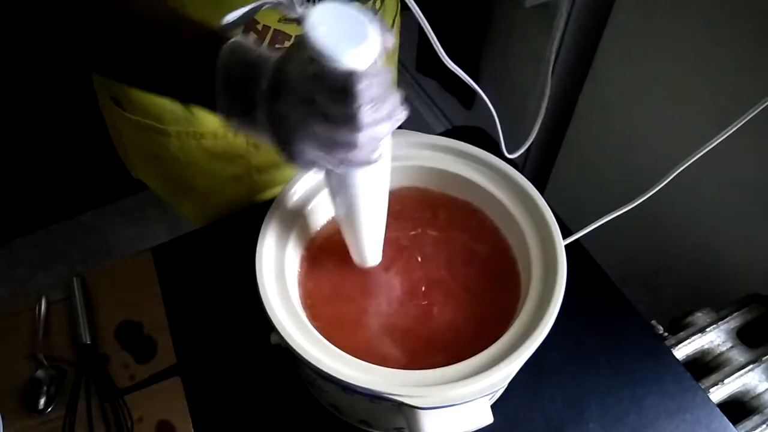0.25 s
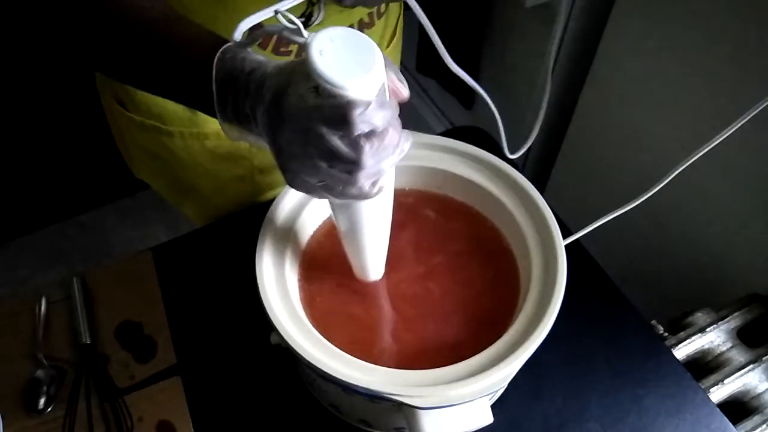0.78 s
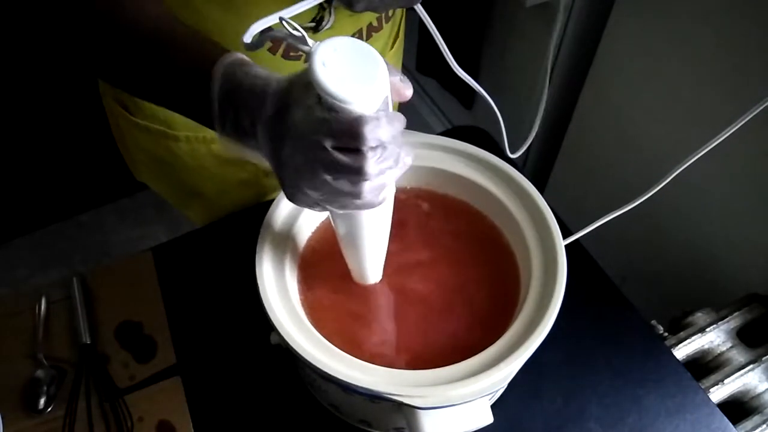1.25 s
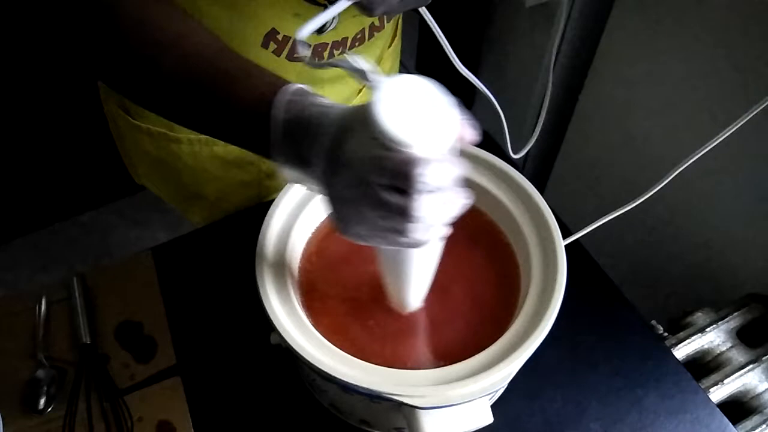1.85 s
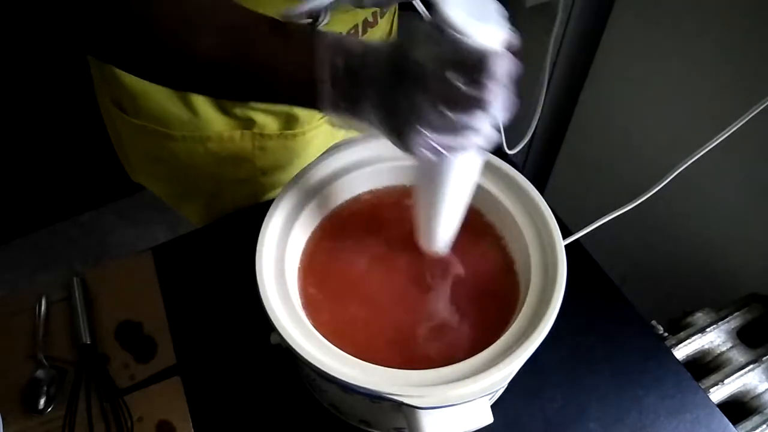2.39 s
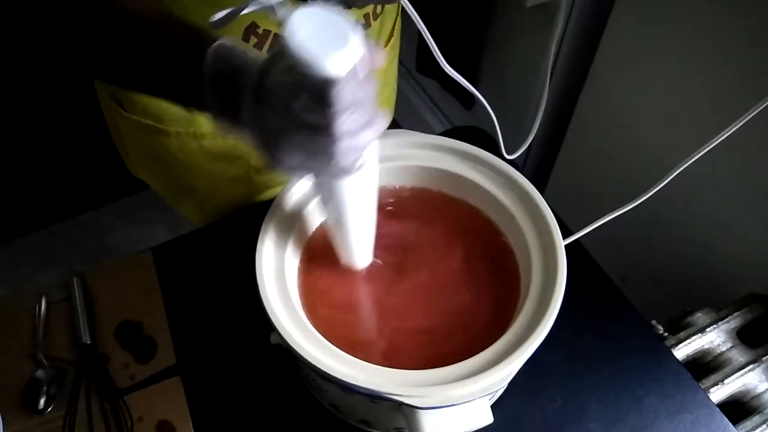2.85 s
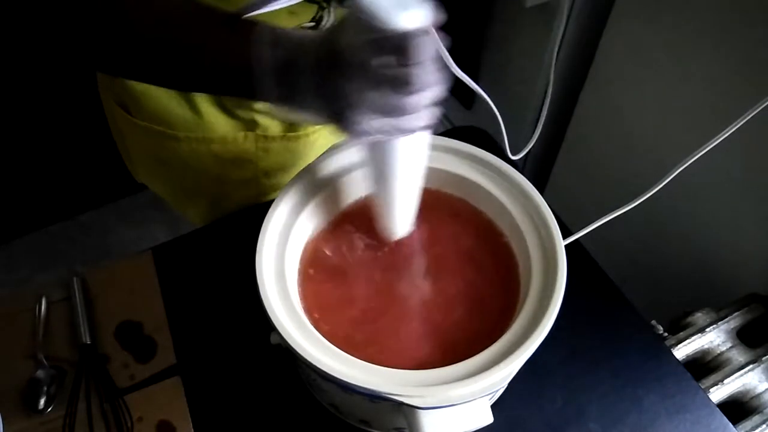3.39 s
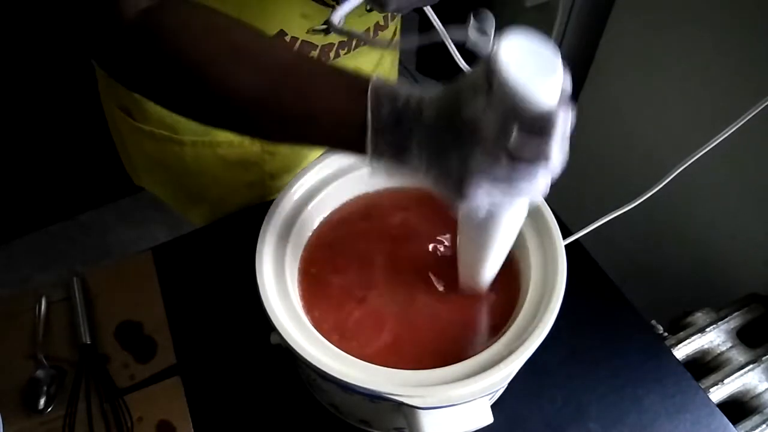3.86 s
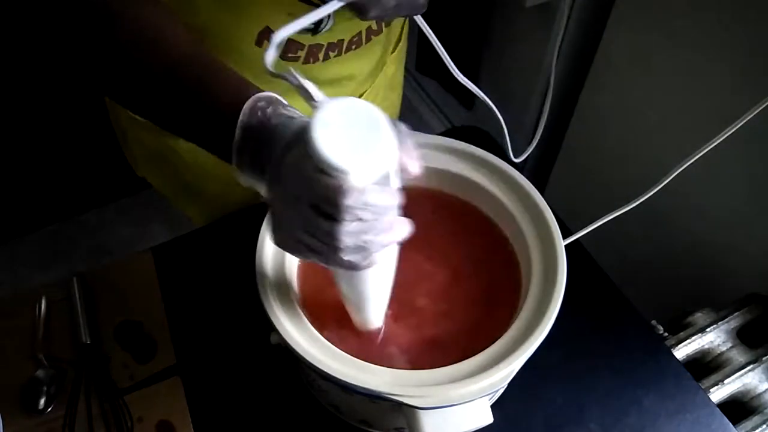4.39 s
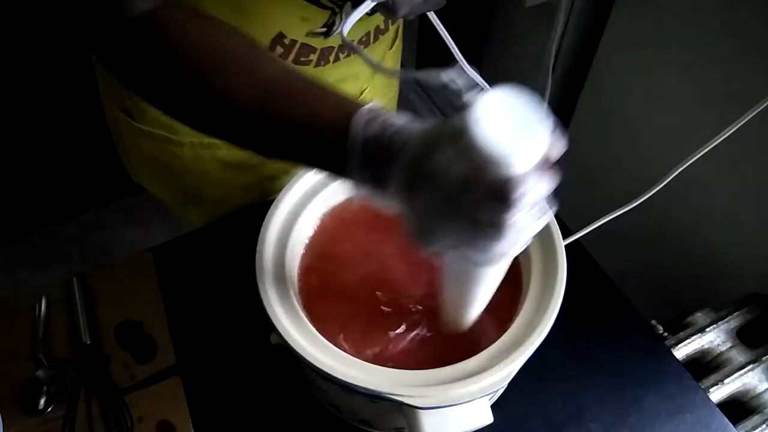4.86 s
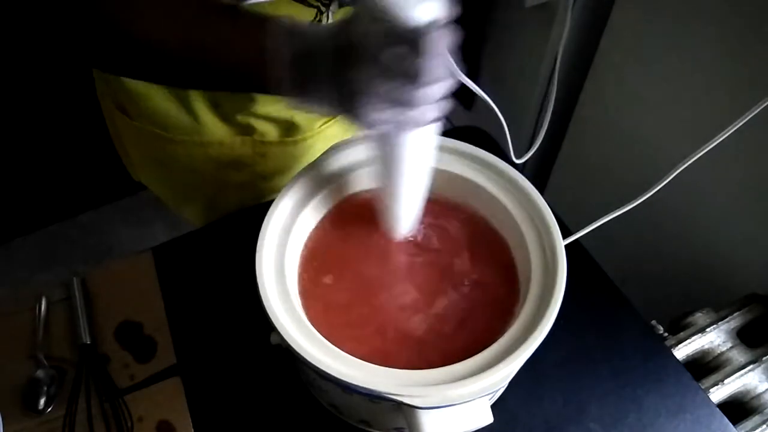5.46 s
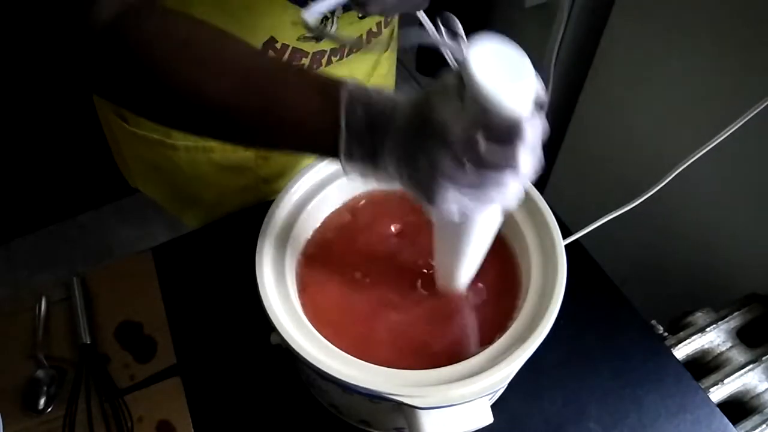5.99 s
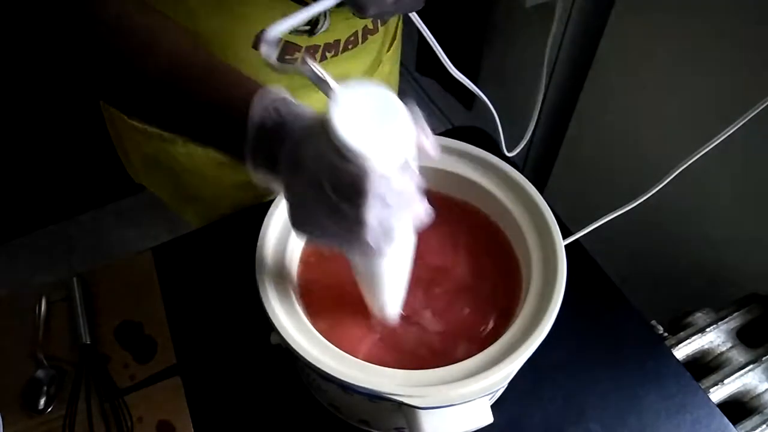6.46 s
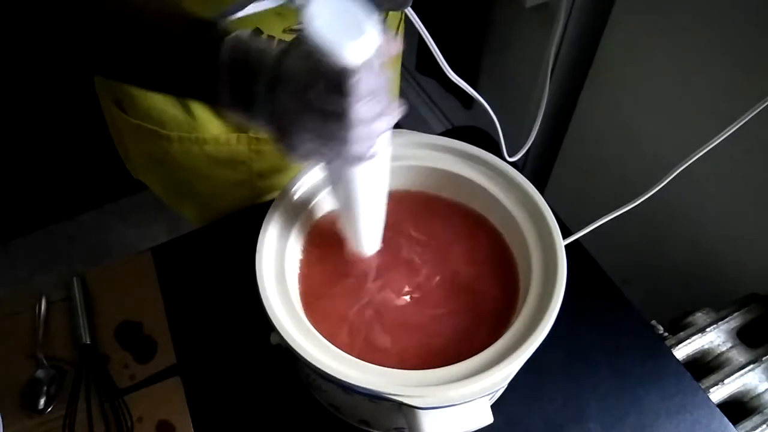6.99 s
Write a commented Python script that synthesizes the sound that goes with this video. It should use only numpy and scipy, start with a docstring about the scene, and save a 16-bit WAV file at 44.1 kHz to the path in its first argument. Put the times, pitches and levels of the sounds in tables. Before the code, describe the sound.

A handheld electric blender winds down, gives a short burst, then runs with a steady raspy whine in a pot, with dull worktop thumps.

```python
"""A hand blender stirs a deep pot of soup: it slows down from its slow setting, gives a short burst, then runs on.
Clear tones at multiples of the shaft speed whine over rattle and hiss, shaped noise from motor and blade;
the ripple of the mains current beats in both. A far compressor hums as steady sines, and bumps and clicks ring out.
Two microphones, the left bright, the right dull and of opposite polarity, hear the blender circle the pot."""
import sys
import numpy as np
from scipy import signal
from scipy.fft import rfft, irfft, next_fast_len
from scipy.io import wavfile
from scipy.ndimage import uniform_filter1d, map_coordinates

SR = 44100
rng = np.random.default_rng(int(sys.argv[2]) if len(sys.argv) > 2 else 0)


def output_pcm(signal):
    """Save a mono or channel-first signal as 16-bit PCM at the path in sys.argv[1].

    Samples are clipped to [-1, 1] before scaling.
    """
    pcm = np.clip(np.atleast_2d(signal).T, -1, 1) * 32767
    wavfile.write(sys.argv[1], SR, np.round(pcm).astype(np.int16))


def ratio(d):
    """dB to gain"""
    e = np.asarray(d, float) / 20
    return 10 ** e


N = 319107  # length [samples]

RIPPLE_HZ = 120  # mains ripple; half-wave current on the slow setting ripples half as fast
SLOW_UNTIL_S = .6  # the slow setting's sound lasts until then
RIM_LEAD_S = 55e-6  # the left microphone hears a blender at the left rim this much sooner
LEFT_RIGHT = np.array([[.5], [-.5]])  # shares a difference between the two sides

# shaft orders: whole multiples of the shaft speed
ORDERS = [1, 2, 3, 4, 5, 6, 8, 9]
# each shaft order between its swells, at full power and speed: level [dB]
ORDER_LEVELS = [-55, -54.5, -42, -40, -51.5, -46, -51.5, -59]
# the hand stirs, leans and turns the housing: (time [s], motor noise [dB], vents facing the microphones [dB],
# left minus right, before its median is taken off [dB], speed lost to load [Hz])
HAND = [(0, -37.5, 3.5, -5.5, 0.018), (.12, -41, 8, -3, -0.064), (.27, -35, 5, 2, -0.049),
        (.45, -39.5, 11.5, 4, -0.025), (.62, -47.5, 22, 2, -0.056), (.8, -31, -11, 8, -0.036),
        (.9, -27.5, 1, 1.5, -0.043), (1.05, -33, 4.5, 2.5, -0.037), (1.25, -28.5, 6, 4, 0.019),
        (1.38, -30.5, 4, 2, 0.11), (1.52, -35.5, 6, 2.5, -0.025), (1.83, -34, 6, 4, -0.33),
        (2.1, -34, 5, 2, -0.58), (2.4, -34.5, 5, 1.5, -0.19), (2.7, -34.5, 8, 2.5, 0.39),
        (2.97, -34, 3.5, 4, 0.33), (3.15, -35.5, 9, 3.5, 0.39), (3.5, -35, 5.5, 2.5, 0.3),
        (3.9, -35.5, 2.5, 0.5, -0.17), (4.33, -32.5, 0, 4, 0.26), (4.55, -33.5, 1.5, 1.5, 0.753),
        (4.9, -35, 1, 3, 0.2), (5.15, -35.5, 1.5, 3, 0.031), (5.4, -33.5, 0, 3.5, 0.056),
        (5.7, -33, 3.5, 2, 0.095), (5.95, -35, -2, 3, 0.0093), (6.2, -34.5, -9, 0, -0.069),
        (6.42, -35.5, -4, 6, -0.012), (6.6, -36, -1.5, 4, 0.095), (6.9, -35.5, 4, 3.5, 0.087),
        (7.23, -35.5, -1, 4, 0.05)]
# the blender circles the pot: (time [s], place [-1 right rim to 1 left rim])
PLACES = [(0, -0.57), (.35, -0.94), (.85, -0.77), (1.4, -0.92), (1.65, -0.77), (2.05, 0.21), (2.35, 0.52),
          (2.6, -.3), (2.85, -1.05), (3.35, -0.84), (3.6, 0.23), (3.9, 0.49), (4.15, 0.26), (4.35, -0.55),
          (4.6, -.95), (4.85, 0.29), (5.1, 0.44), (5.35, 0.33), (5.6, -0.83), (5.85, 0.04), (6.1, 0.62),
          (6.35, 0.056), (6.6, -0.57), (7.1, -0.76), (7.24, -0.72)]
# dull bumps through the worktop: (time [s], strength [dB], pitch [Hz], time to fall 60 dB [s])
WORKTOP_BUMPS = [(.2, -39, 71.3, 0.22), (.35, -45, 119.8, 0.15), (.6, -41, 70.3, 0.39), (.645, -47, 69, .2),
                 (0.719, -59, 101, .2), (.848, -30, 65.3, 0.1), (1.152, -37, 69.9, 0.17),
                 (1.323, -35, 68, 0.26), (1.49, -35, 67, .25), (2.68, -42, 75.16, 0.23),
                 (4.478, -41, 65.7, 0.35), (4.707, -31, 64.8, 0.23), (5.39, -46, 111.5, 0.14),
                 (5.521, -39, 67.96, .2), (5.741, -29, 70.9, 0.15), (6.06, -47, 62, 0.26),
                 (6.4, -63, 60, 0.22), (7.13, -40, 64, .3)]


def line(table):
    """Columns of a table, joined by straight lines in time."""
    s, *columns = np.transpose(table)
    return np.array([np.interp(np.arange(N) / SR, s, column) for column in columns])


def at(table, hz):
    """Value of a (frequency, value) table, read along a logarithmic frequency axis."""
    table_hz, values = np.transpose(table)
    return np.interp(np.log(hz + 1e-9), np.log(table_hz), values)


def walk(rate):
    """Random levels held 1 / rate s and smoothed twice; spread near 1."""
    hold = int(SR / rate)
    steps = np.repeat(rng.standard_normal(N // hold + 1), hold)
    return 1.136 * uniform_filter1d(uniform_filter1d(steps, hold), hold)[:N]


def pair(colour, source):
    """Spectra of two partly alike noises of the given colour, from one common and two own sources."""
    # how alike the two sides are: (frequency [Hz], share of power common to both [0 to 1])
    likeness = [(60, 0.94), (300, 0.83), (520, 0.8), (750, 0.78), (1400, 0.43), (2400, 0.42), (3300, 0.32),
                (4500, 0.17), (7000, 0.04)]
    size = next_fast_len(N)
    hz = np.arange(size // 2 + 1) * SR / size
    common, *own = rfft(source, size)
    share = at(likeness, hz)
    mixed = np.sqrt(share) * common + np.sqrt(1 - share) * np.array(own)
    return hz, size, mixed * ratio(at(colour, hz))


def shaft():
    """Shaft speed, its share of the setting and the current: held, it nears the setting; let go, drag slows it."""
    # the button is held: (pressed [s], let go [s], shaft speed of the setting [turns per s])
    presses = [(-0.8, .28, 164.4), (.835, 1.08, 207.2), (1.322, 8, 207.2)]
    spin_up_s = .068  # time constant under power
    coast_s = .29  # time for the soup's drag to halve the speed
    switch_s = .034  # contact closing or opening
    t = np.arange(N) / SR
    hz, setting, on = np.zeros(N), np.zeros(N), np.zeros(N)
    now = 0  # speed carried over to the next press
    next_presses = [p[0] for p in presses[1:]] + [np.inf]
    for (press, release, top), later in zip(presses, next_presses):
        held = np.clip(t, press, release) - press
        driven = top + (now - top) * np.exp(-held / spin_up_s)
        run = driven / (1 + np.clip(t - release, 0, None) / coast_s)
        active = (t >= press) & (t < later)
        hz = np.where(active, run, hz)
        setting = np.where(active, top, setting)
        on = on + (active & (t < release))
        now = hz[active][-1]
    current = uniform_filter1d(on, int(switch_s * SR))
    return hz - line(HAND)[3], hz / setting, current


def swells(order, base_db):
    """Amplitude of one shaft order: it swells where housing and pot favour the tone."""
    # by order: (time [s], height added to the resting amplitude [dB], length [s])
    passing = {1: [(1.62, -53, 0.15), (1.97, -52, 0.12), (2.3, -47, 0.55), (2.8, -60, 0.31),
               (3.15, -62, 0.2), (4.05, -47.5, 0.4), (5.2, -42.5, 0.45), (6.15, -49.5, 0.35),
               (6.55, -49.5, 0.32), (7.1, -70, 0.39)], 2: [(1.04, -50, .1), (1.6, -51.5, 0.28),
               (2.1, -55, 0.52), (3.3, -57, 0.25), (4.6, -50.5, 0.45), (6.05, -63, 0.23),
               (6.65, -53, 0.13)], 3: [(1.3, -52, 0.095), (2.15, -51, 0.2), (2.7, -39, 0.16),
               (3.1, -48, 0.22), (4.15, -52, 0.3), (5.0, -44, 0.22), (5.5, -42, 0.21), (6.6, -54, 0.3),
               (7.1, -60, 0.21)], 4: [(1.03, -46, .14), (1.47, -29.5, 0.095), (1.9, -30, 0.16),
               (2.15, -38, 0.49), (2.75, -40, 0.2), (3.17, -34, 0.11), (3.9, -47, 0.29), (4.26, -40, 0.18),
               (4.87, -36, 0.3), (5.6, -50, 0.17), (5.96, -41, 0.17), (6.55, -36, 0.33), (7.0, -43, 0.16)],
               5: [(.17, -42, 0.27), (1.54, -38, 0.058), (1.68, -37, 0.18), (2.0, -44.5, 0.43),
               (2.97, -38, 0.3), (4.35, -36.5, 0.3), (4.7, -38.5, 0.32), (5.56, -50, 0.071),
               (6.0, -61, 0.37), (6.36, -44, 0.15), (6.63, -36, 0.37), (7.22, -40.5, 0.095)],
               6: [(1.03, -45, 0.081), (1.9, -44, 0.27), (2.36, -48, 0.28), (2.84, -49, 0.54),
               (3.75, -42, 0.7), (4.5, -47, 0.37), (5.17, -45, 0.29), (6.0, -48.5, 0.26),
               (6.84, -46, 0.16)], 8: [(1.03, -28, 0.076), (1.56, -39, 0.16), (2.76, -34.5, 0.23),
               (3.2, -36, 0.6), (4.15, -46, 0.33), (5.0, -48.5, 0.5), (5.68, -33, 0.22), (6.36, -39, 0.13),
               (6.75, -41, 0.11), (7.03, -32.5, 0.26)], 9: [(1.6, -40, 0.2), (2.84, -46, .2),
               (3.16, -39.5, 0.18), (4.2, -45, 0.13), (4.46, -31.5, 0.25), (5.56, -39.5, 0.26),
               (7.07, -41.5, 0.2)]}
    t = np.arange(0, N + 99, 99) / SR
    # the cube gives each swell a flat top
    bells = sum(ratio(db) * np.exp(-4.5 * abs((t - s) / length) ** 3) for s, db, length in passing[order])
    return np.interp(np.arange(N) / SR, t, ratio(base_db) + bells)


def zones(share, current):
    """Noise level and each zone's lift [dB]: the hand's pose, and loudness as a power of the speed."""
    # how much of the vents' facing each zone takes: share for roar, rattle, hiss, fizz
    facing_shares = [0, .3, .45, .95]
    driven_power, coasting_power = 3.5, 5.76
    rattle_order, rattle_share = 8, .07  # the rattle rises by this share of that order's swells in dB
    level_db, facing_db = line(HAND)[:2]
    exponent = coasting_power + (driven_power - coasting_power) * current
    lift = np.outer(facing_shares, facing_db)
    resting_db = ORDER_LEVELS[ORDERS.index(rattle_order)]
    rattle_db = 20 * np.log10(swells(rattle_order, resting_db))
    lift[1] += rattle_share * (rattle_db - rattle_db.mean())
    return level_db + exponent * 20 * np.log10(share), lift


def whine(turn, ripple, hz, strength, rattle_db):
    """Sines at shaft orders and a mains ripple away from them; levels and arrival drift as the hand moves."""
    # how each order arrives: (left minus right [dB], left ahead [rad],
    # change from mid pot to the left rim [dB], the same for the lead [rad])
    arrivals = [(3.5, 0.61, 1.5, -0.1), (-5, -0.86, -3.5, 0.25), (-2.5, 0.22, -5, -0.48),
                (4, 0.62, 0, 0.23), (1, 1.397, -2, 0.26), (-5, -0.99, 5, -1.5), (6.5, 0.64, 1, 1.45),
                (5, -0.66, 3.5, 0.8)]
    # weaker tones at full speed: (order, rounded for the pitch [turn multiples], ripples away [count], level [dB])
    weak_fast = [(0, 1, -69), (1, 1, -72.5), (1, 2, -66), (1.99, 1, -63), (3, -1, -69), (3.03, 1, -50.5),
                 (4, -1, -63), (4, 1, -61), (4.9, -1, -47), (5, 1, -51), (6, -1, -58), (6, 1, -52.5),
                 (6.9, 0, -53), (7, 1, -55), (8, -1, -58), (8, 1, -58), (9.3, 1, -47.5), (9.6, 0, -51.5),
                 (11.1, 1, -51), (11.7, 1, -55), (11.8, 0, -54), (13.015, 0, -50.5), (14, -1, -61),
                 (15.4, 0, -50.5), (20.2, 1, -59), (21.8, 0, -57), (24, 0, -51.5)]
    # the same on the slow setting: (order [turn multiples], ripples away [count], level [dB])
    weak_slow = [(3, 1, -57), (4, -1, -52), (4, 1, -64), (5, 0, -56), (6, 1, -57), (7, 0, -44.5),
                 (7, 1, -53), (8, 1, -52), (11, -1, -51), (13, 1, -63)]
    slow_tones_db = -19  # the main orders are weaker on the slow setting
    out = 0
    # the shaft shudders while its speed changes, which blurs the glides
    speeding = abs(uniform_filter1d(np.gradient(hz) * SR, SR // 20))
    turn = turn + .055 * np.sqrt(speeding / 300) * walk(45)
    slow = np.arange(N) < SLOW_UNTIL_S * SR
    place = line(PLACES)[0]
    for order, db, (pan_db, lead, rim_db, rim_lead) in zip(ORDERS, ORDER_LEVELS, arrivals):
        pan = pan_db + rim_db * place + 1.1 * walk(4)
        ahead = lead + rim_lead * place + .1 * walk(5)
        phase = order * turn + .18 * walk(30) + LEFT_RIGHT * ahead
        wander = 1.46 * walk(22) + .54 * walk(8.4)
        level = swells(order, db) * ratio(slow * slow_tones_db + wander + LEFT_RIGHT * pan)
        out = out + level * np.sin(phase + rng.uniform(0, 2 * np.pi))
    # the weaker tones at full speed follow the rattle
    swell_db = uniform_filter1d(rattle_db, SR // 5)
    swell_db = swell_db - np.median(swell_db)
    for table, on, base_db in ((weak_fast, ~slow, swell_db), (weak_slow, slow, 0)):
        for order, ripples, db in table:
            jitter = (.25 + .05 * order) * (1 - .6 * slow) * walk(20)
            ahead = 2 * np.pi * order * hz * RIM_LEAD_S * place + .9 + slow + .04 * order * walk(3)
            phase = round(order) * turn + round(ripples) * ripple + jitter + LEFT_RIGHT * ahead
            wander = (3.5 - 2.3 * slow) * walk(6) + LEFT_RIGHT * 2.2 * walk(3)
            out = out + on * ratio(db + base_db + wander) * np.sin(phase + order)
    return np.sqrt(2) * strength * out


def clatter(turn):
    """Noise tied to the shaft angle, so it nearly repeats each turn, mixed with fresh noise."""
    repeat_share, repeat_turns = .16, 7.3  # share of power that recurs; turns it takes to change
    turns, steps = turn / (2 * np.pi), 192  # random steps in each turn
    pattern = rng.standard_normal((3, int(turns[-1]) + 2, steps))
    pattern = signal.lfilter([1], [1, -np.exp(-1 / repeat_turns)], pattern, axis=1).reshape(3, -1)
    repeat = np.array([np.interp(turns * steps, np.arange(len(p)), p) for p in pattern])
    fresh = rng.standard_normal((3, N))
    return np.sqrt(repeat_share) * repeat / repeat.std() + np.sqrt(1 - repeat_share) * fresh


def band_swells(octave):
    """Level change [dB] at this octave (log2 Hz): passing swells and dips of noise level around one pitch."""
    # passing swells and dips: (time [s], centre [Hz], peak change [dB], length [s])
    passing = [(0.088, 12600, 11, 0.16), (.1, 305, 8, 0.65), (3.25, 289.8, -4, 1.4), (7.0, 300, -2, .5),
               (.5, 3540, -5.5, 0.72), (0.907, 372, -20, 0.18), (1.061, 280, -6, 0.088),
               (0.92, 534, 6, 0.46), (1.2, 333, -11, 0.18), (1.219, 565, 8, 0.25), (1.5, 700, 2, 0.65),
               (2.52, 722, 10, 0.14), (3.094, 4730, 4, 0.9), (3.799, 7360, 3.5, 0.5),
               (3.751, 5408, 5, 0.95), (4.199, 348.5, 4, .4), (4.8, 3014, 3, 1.7), (2.601, 5050, 2, 0.52),
               (7.092, 4200, 4.5, 0.35), (4.4, 4212, -2, 1), (5.215, 6005, 9.5, 0.52),
               (5.804, 702, 4, 0.17), (5.939, 2450, -10, 0.21), (6.3, 760, 2, .15), (6.453, 2456, 6, 0.17),
               (6.64, 750, 5.5, 0.39), (6.95, 3200, -5, 0.33), (6.999, 6390, -0.5, 0.37)]
    reach_octaves = 0.32  # how far each one spreads in pitch
    t = np.arange(0, N + 99, 99) / SR
    total_db = 0
    for s, hz, db, length in passing:
        distance = ((octave - np.log2(hz)) / reach_octaves) ** 2
        total_db = total_db + db * np.exp(-distance - (2 * (t - s) / length) ** 2)
    return np.interp(np.arange(N) / SR, t, total_db)


def motor(turn, ripple, current, roar_db, lift):
    """Brush and bearing rattle and blade hiss: noise beating once and twice a turn and with the mains."""
    # centres of roar, rattle, hiss and fizz: frequency [Hz]
    zone_centres = [900, 2400, 5300, 11500]
    # noise colour at the left microphone, before scaling: (frequency [Hz], density [dB per Hz])
    housing = [(120, -24.5), (230, -22.5), (300, -25.5), (370, -21), (480, -13.5), (700, -8), (1000, -3),
               (1400, -4.5), (2000, -4.5), (3000, -7), (4300, -9.5), (5500, -16.5), (9000, -17.5),
               (12300, -9.5), (13600, -16), (14500, -28), (15600, -30)]
    # how the duller right microphone differs: (frequency [Hz], change [dB])
    right_colour = [(200, 4.5), (700, -1.5), (4400, -1.5), (6500, -3), (8500, -11.5), (11000, -23.5),
                    (13300, -89), (13900, -70)]
    # resonances of housing and pot: (centre [Hz], width [Hz], peak change [dB])
    resonances = [(790, 54, 5), (1567, 27, 5.5), (1983, 135, 4.5), (2390, 54, 4), (2610, 210, 2.5),
                  (3570, 280, 2.5), (4240, 320, 2), (5050, 130, 2), (5750, 180, 3), (6700, 73, 2.5),
                  (10500, 5000, -2), (11800, 260, 3), (13030, 380, 5)]
    # change of colour on the slow setting: (frequency [Hz], change [dB])
    slow_colour = [(300, -3), (430, -2), (580, 3), (1100, -1.5), (2200, -6.5), (2800, -5), (3150, -12),
                   (3400, -15), (3700, -5), (4300, -1), (4900, -4), (6500, -7), (9000, -4)]
    slow = np.arange(N) < SLOW_UNTIL_S * SR
    beat = 1 + .045 * np.cos(turn) + .035 * np.cos(2 * turn + 2.0)
    beat = beat + (.04 + .15 * slow) * current * np.cos(ripple)
    grit = beat * ratio(.32 * walk(400) + .08 * walk(60))
    hz, size, noise = pair(housing, clatter(turn) * grit)
    noise *= ratio(sum(db / (1 + (2 * (hz - centre) / width) ** 2) for centre, width, db in resonances))
    noise[1] *= ratio(at(right_colour, hz))
    noise /= np.std(irfft(noise * ((hz > 500) & (hz < 1600)), size))  # the middle band sets the level
    pan_db = line(HAND)[2]
    lean = LEFT_RIGHT * (pan_db - np.median(pan_db))
    out, octave = 0, np.log2(hz + 1e-9)
    spit = walk(90) + walk(700)  # the fizz spits more than the roar
    for centre in np.log2(100) + np.arange(23) / 3:  # bands a third of an octave apart
        band = np.clip(1 - 3 * abs(octave - centre), 0, 1)
        weight = [np.interp(centre, np.log2(zone_centres), row) for row in np.eye(4)]
        flicker = .72 * walk(2.72) + .5 * np.array([walk(25), walk(25)]) + 1.22 * weight[3] * spit
        # slow random unevenness of each band, larger below about 720 Hz
        unevenness = (1 + 3.3 * (centre < 9.5)) * walk(9)
        change_db = weight @ lift + flicker + band_swells(centre) + unevenness
        out = out + irfft(noise * band, size)[:, :N] * ratio(change_db)
    slow_sound = irfft(rfft(out, size) * ratio(at(slow_colour, hz)), size)[:, :N]
    out = np.where(slow, slow_sound, out)
    # the right microphone hears it later or sooner as the blender circles
    heard_at = np.arange(N) - RIM_LEAD_S * SR * line(PLACES)[0]
    right = map_coordinates(out[1], [heard_at], mode="mirror")
    return np.array([out[0], right]) * ratio(roar_db + lean)


def kitchen():
    """Compressor hum as wavering sines, the booming worktop and a faint room floor as coloured noise."""
    # compressor hum: (frequency [Hz], level [dB])
    hum_tones = [(59, -72), (118, -80), (236, -63.5), (295, -69), (354, -73), (472, -73), (738, -81),
                 (1003, -93), (1062, -89), (1239, -85), (1298, -90), (1357, -90), (1475, -85), (4720, -87)]
    # colour of the room floor, before scaling: (frequency [Hz], density [dB per Hz])
    room_colour = [(100, -8.5), (230, -18), (310, -17), (520, -21), (1100, -29), (1700, -46), (3000, -53),
                   (6000, -38), (12500, -54), (15500, -79)]
    # colour of the worktop's boom, before scaling: (frequency [Hz], density [dB per Hz])
    boom_colour = [(20, -18), (40, -16), (60, 1), (85, -6), (115, -15), (160, -11), (300, -75)]
    room_db, rumble_db = -62, -58
    after_bump_db, boom_t60_s = -14.5, 1  # extra boom relative to each bump; time to fall 60 dB
    t, out = np.arange(N) / SR, 0
    # the worktop booms under the stirring, more after each bump
    boom = ratio(rumble_db)
    for s, db, *_ in WORKTOP_BUMPS:
        boom = boom + (t > s) * ratio(db + after_bump_db - 60 * abs(t - s) / boom_t60_s)
    boom = uniform_filter1d(boom, SR // 30) * ratio(1.7 * walk(13))
    for colour, gain in ((room_colour, ratio(room_db)), (boom_colour, boom)):
        hz, size, noise = pair(colour, rng.standard_normal((3, N)))
        sound = irfft(noise, size)[:, :N]
        out = out + sound / np.std(sound) * gain
    for k, (hz, db) in enumerate(hum_tones):
        lead = np.array([[hz / 900], [0]])  # the left leads [rad]
        out = out + np.sqrt(2) * ratio(db + 1.6 * walk(1.4)) * np.sin(2 * np.pi * hz * t + k + lead)
    return out


def knocks():
    """Bumps are two fading sines, a little earlier on the left; plastic clicks are short bursts of noise."""
    # switch and coupling: (time [s], strength of the noise before its filters [dB])
    plastic_clicks = [(0.458, -54), (0.527, -47), (.838, -64), (0.845, -35.5), (0.859, -35)]
    out, t = np.zeros((2, N + SR)), np.arange(SR // 2) / SR
    lead = np.array([[.35], [0]])  # left, right [rad]
    for s, db, hz, t60 in WORKTOP_BUMPS:
        ring = np.sin(2 * np.pi * hz * t + lead) + .55 * np.sin(2 * np.pi * 1.71 * hz * t + lead)
        soft_start = 1 - np.exp(-t / .0063)
        out[:, int(s * SR):][:, :len(t)] += ratio(db - 60 * t / t60) * ring * soft_start
    snap = rng.standard_normal((len(plastic_clicks), 2, len(t))) * ratio(-60 * t / .021)
    low = signal.sosfilt(signal.butter(3, [2200, 2900], "band", fs=SR, output="sos"), snap)
    high = signal.sosfilt(signal.butter(3, [8000, 13500], "band", fs=SR, output="sos"), snap)
    bursts = low + high * ratio(np.array([[1.5], [-16]]))  # the treble is far weaker on the right
    for (s, db), burst in zip(plastic_clicks, bursts):
        out[:, int(s * SR):][:, :len(t)] += ratio(db) * burst
    return out[:, :N]


def scene():
    """Blender, kitchen background, bumps and clicks, added together."""
    tone_power = 8  # the tones stand out near full speed
    coasting_tones_db = -7  # what is left of the tones once the current is off, before the speed's effect
    t = np.arange(N) / SR
    hz, share, current = shaft()
    turn = 2 * np.pi * np.cumsum(hz + .4 * walk(12)) / SR  # shaft angle, with a small wobble [rad]
    ripple = 2 * np.pi * RIPPLE_HZ * t * np.where(t < SLOW_UNTIL_S, .5, 1)
    roar_db, lift = zones(share, current)
    strength = np.maximum(current, ratio(coasting_tones_db)) * share ** tone_power
    tones = whine(turn, ripple, hz, strength, roar_db + lift[1])
    return tones + motor(turn, ripple, current, roar_db, lift) + kitchen() + knocks()


def roll_off(x):
    """The treble ends steeply here."""
    return signal.sosfilt(signal.butter(12, 15640, fs=SR, output="sos"), x)


def record(dry):
    """Two microphones, the right one of opposite polarity."""
    mix = dry * np.array([[1], [-1]])
    return roll_off(mix)


dry = scene()
out = record(dry)
output_pcm(out)
```